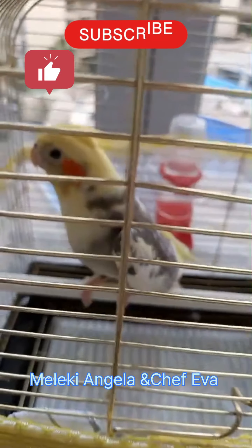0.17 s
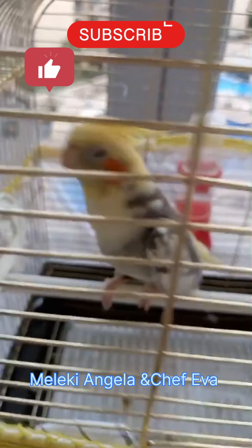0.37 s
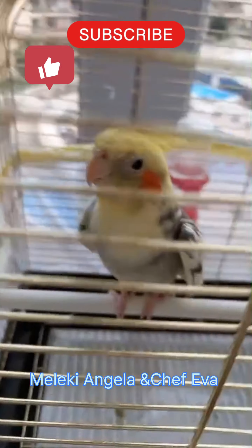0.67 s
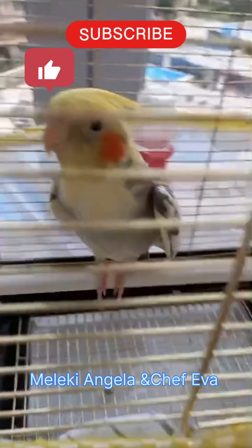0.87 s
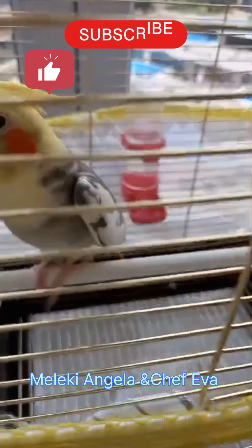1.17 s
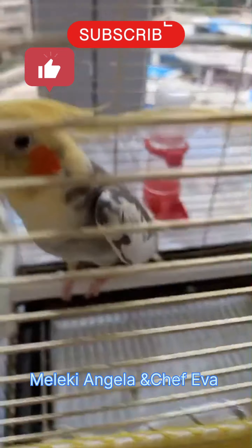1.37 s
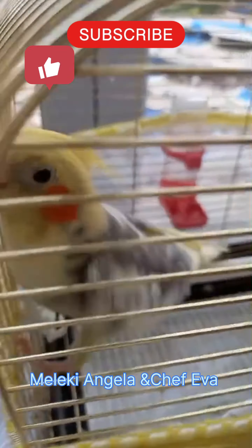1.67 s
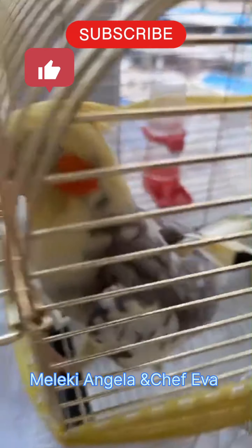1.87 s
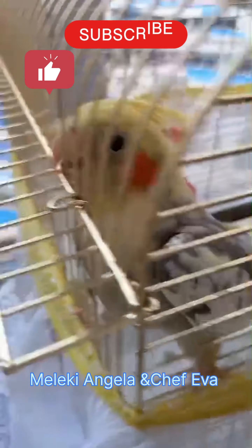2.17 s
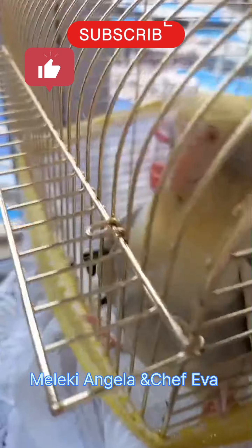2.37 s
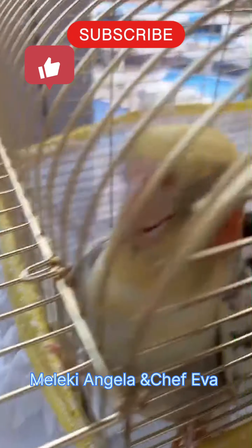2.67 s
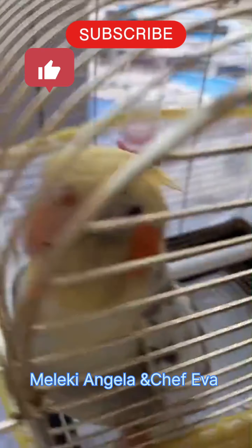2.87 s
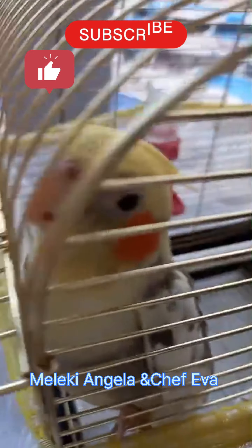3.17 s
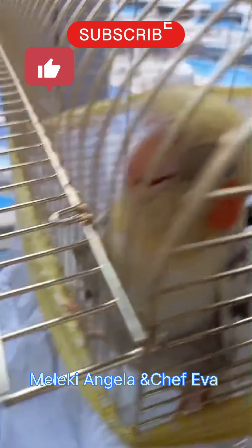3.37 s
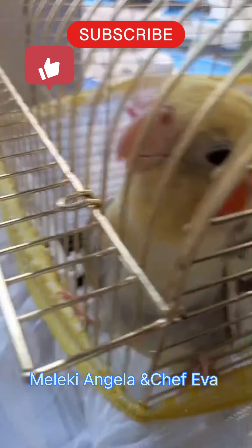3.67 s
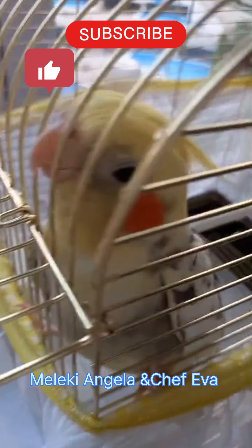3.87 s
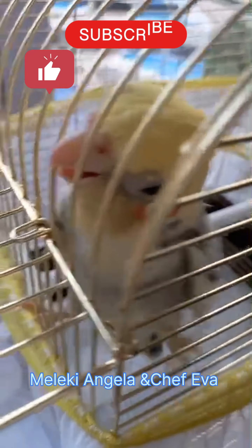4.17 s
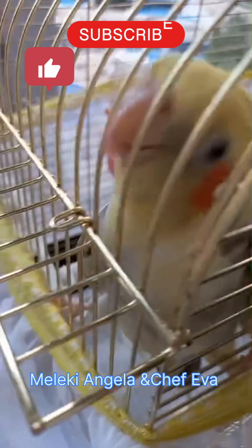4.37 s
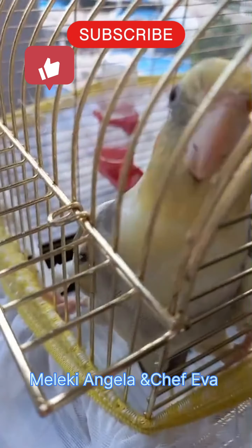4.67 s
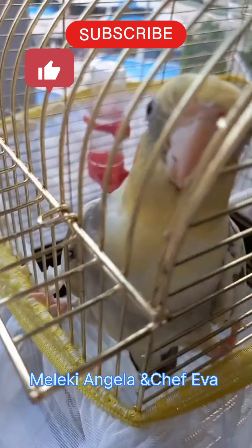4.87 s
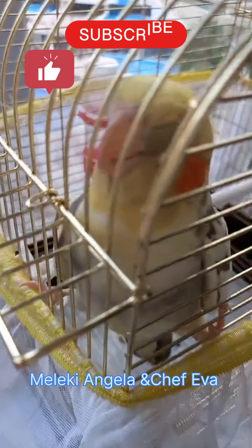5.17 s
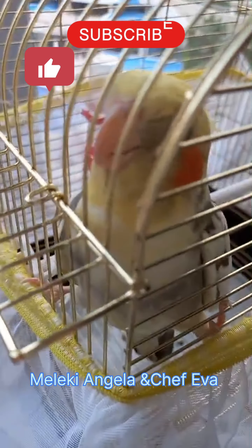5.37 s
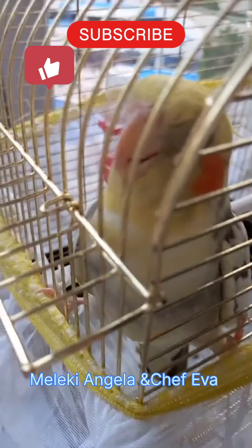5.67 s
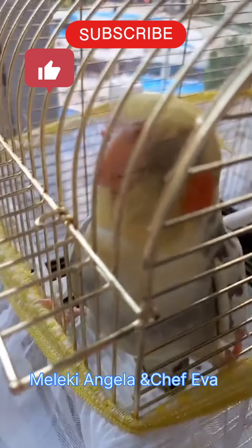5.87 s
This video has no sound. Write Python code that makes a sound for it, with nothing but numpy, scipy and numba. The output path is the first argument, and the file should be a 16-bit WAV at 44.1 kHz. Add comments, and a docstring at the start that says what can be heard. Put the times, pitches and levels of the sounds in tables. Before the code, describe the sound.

The first 1.2 seconds hold only faint room hiss and a weak, wavering low hum. At about 1.2 s a cockatiel, close and left of centre, gives a tiny croak opening into a short whistle, then a longer, slightly rough, nearly level one at 1.4-1.6 s. Quiet follows, with barely audible cage ticks near 1.8 and 2.2 s. At 2.45 s a short chip starts a run of seven raspy, throaty chirps, about six per second, each dipping and rising, until 3.6 s. A very faint, thin, high squeak overlaps the end, then a breathy hiss at 3.7-3.95 s. A croak and bright whistle come at 4.15 s, another whistle at 4.4-4.6 s leaping to a loud piercing peak. A tick and gritty scrape follow around 4.7 s. From 5.05 s a chip and five more chirps run to the end. The small hard room and cage wires add short reflections.

```python
"""In a small hard room a cockatiel in a wire cage sings close to a phone, nearer its left port.
Whistles are overtone stacks on one phase that at times skip cycles; a thin squeak is one gliding sine.
Croaks, chips, chirps, a hiss and a scrape are an irregular flutter of the syrinx ringing a throat,
a beak and a nasal resonance. A low hum wavers under faint room hiss; short decaying rings tick in
the cage. The room and the cage wires answer the bird with decaying noise."""
import sys
import numpy as np
from scipy import signal
from scipy.fft import rfft, irfft, next_fast_len
from scipy.io import wavfile
from scipy.ndimage import uniform_filter1d
from numba import njit

SR = 44100
rng = np.random.default_rng(int(sys.argv[2]) if len(sys.argv) > 2 else 0)


def to_wav(sig):
    """Store sig (one row per channel, or 1-D mono) as 16-bit WAV at the path in sys.argv[1].

    Samples outside -1..1 are clipped; the rate is SR.
    """
    pcm = np.clip(np.atleast_2d(sig), -1, 1) * 32767
    pcm = np.round(pcm).astype(np.int16)
    wavfile.write(sys.argv[1], SR, pcm.T)  # frames by channels


def nominal_scale(level):
    """Amplitude ratio for a level in decibels (scalar or array-like)."""
    x = np.asarray(level, float) / 20
    return 10 ** x


N = 265923
T = np.arange(N) / SR  # time in s


def unit(x):
    """Power normalisation: scale to rms 1."""
    return x / np.sqrt(np.mean(x ** 2))


def curve(rows):
    """Linear interpolation: the columns of a table over all samples, the first column being time in s."""
    s, *columns = np.transpose(rows)
    return np.array([np.interp(T, s, c) for c in columns])


def colour_db(hz, points):
    """Logarithmic frequency scale: read (Hz, value) points along it."""
    f, db = np.transpose(points)
    return np.interp(np.log(np.maximum(hz, 1)), np.log(f), db)


def shape(x, points, lag_s=0.):
    """Linear filtering: a spectrum times a gain in (Hz, dB) points and the phase of a pure delay."""
    size = next_fast_len(N + 4096)
    hz = np.arange(size // 2 + 1) * SR / size
    response = nominal_scale(colour_db(hz, points)) * np.exp(-2j * np.pi * hz * lag_s)
    return irfft(rfft(x, size) * response, size)[..., :N]


@njit
def svf(x, hz, width):
    """Second-order resonance: a state-variable band-pass whose centre and width move."""
    y, b, l = np.empty(len(x)), 0., 0.
    for i in range(len(x)):
        g, k = np.tan(np.pi * hz[i] / SR), width[i] / hz[i]
        v = (b + g * (x[i] - l)) / (1 + g * (g + k))
        b, l, y[i] = 2 * v - b, l + 2 * g * v, k * v
    return y


def band(x, hz, width_hz):
    """Cascaded resonance: two equal band-passes, with the same power whatever their width."""
    hz, width_hz = hz + 0 * T, width_hz + 0 * T
    once = svf(x, hz, width_hz)
    return unit(svf(once, hz, width_hz) / np.sqrt(width_hz))


def walk(rate):
    """Low-pass filtered noise: a smooth random wander of spread 1."""
    size = max(int(SR / rate), 1)
    smooth = uniform_filter1d(rng.standard_normal(N), size)
    return unit(uniform_filter1d(smooth, size))


def locked(x, grip):
    """Self-sustained vibration: amplitude limiting evens out the swing of a narrow band."""
    swing = np.abs(signal.hilbert(x, next_fast_len(N))[:N])
    return unit(x / (swing + 0.06) ** grip)


EDGE_DB = -26  # level at the foot of an attack or release, against its first or last row


def edged(rows, attack_s, release_s, levels):
    """Exponential onset and decay: add the foot of each; levels marks the dB columns."""
    rows, drop = np.array(rows, float), EDGE_DB * np.array(levels)
    first, last = rows[0] + drop, rows[-1] + drop
    first[0], last[0] = first[0] - attack_s, last[0] + release_s
    return np.vstack([first, rows, last])


# low hum before its random waver: time_s [s], level_db [dB]
HUM_LEVEL = [(0.0, -76.5), (0.55, -55.5), (0.94, -61), (1.02, -73.5), (1.54, -61.5), (1.83, -75.5),
             (1.98, -60), (2.25, -84), (2.62, -60.5), (2.75, -71.5), (3.27, -48.5), (3.32, -62.5),
             (4.25, -62), (4.3, -73), (4.42, -53), (4.79, -80.5), (5.09, -60), (6.03, -65)]
# gain of the room hiss's treble before its slow wander: time_s [s], gain_db [dB]
HISS_GAIN = [(0.0, -65), (0.94, -67), (1.25, -47.5), (1.7, -60), (2.27, -66), (2.69, -54), (3.5, -64.5),
             (4.1, -75), (4.9, -74.5), (5.3, -61.5), (6.03, -56)]
# relative spectral density of the room hiss: frequency_hz [Hz], density_db [dB per Hz]
HISS_SPECTRUM = [(20, 13.5), (50, 23), (130, 15), (270, 14.5), (600, 5), (1400, -2.5), (3500, -7.5),
                 (4600, -9.5), (5700, 1), (6800, -4.5), (7800, -16.5), (12000, -12.5), (16000, -13)]


def background():
    """Partial coherence: a hum nearly equal at both ports, and hiss shared only at low frequencies."""
    hum_gain = nominal_scale(curve(HUM_LEVEL)[0] + 4.2 * walk(8))
    hum = locked(band(rng.standard_normal(N), 84., 12.9), 0.65) * hum_gain
    side = band(rng.standard_normal(N), 84., 25.) * hum_gain * nominal_scale(-18.0)
    near, left, right = rng.standard_normal((3, N))
    shared = shape(near, [(60, 1.0), (300, 3.5), (700, -7), (1500, -22)])
    hiss = shape(np.array([left, right]) + shared, HISS_SPECTRUM)
    treble = shape(hiss, [(250, -34.0), (700, 0.0)])
    rumble = nominal_scale(-75.0) * (hiss - treble)
    treble = treble * nominal_scale(curve(HISS_GAIN)[0] + 1.07 * walk(1.3))
    return hum * nominal_scale([[-1.2], [1.2]]) + side * np.array([[1], [-1]]) + rumble + treble


def short_call(course, start_s, length_s, db, change_db):
    """Time scaling: stretch a course of resonances to a call's length and level."""
    share, throat_hz, throat, beak_hz, beak, nasal, air = np.transpose(course)
    db = db + change_db * (share - .5)
    return np.transpose([start_s + share * length_s, throat_hz, throat + db,
                         beak_hz, beak + db, nasal + db, air + db])


# croaks that open a whistle: start_s [s], length_s [s], gain_db on the course [dB],
# change_db over the call [dB]
CROAK_TIMES = [(1.171, .03, -5, 2), (4.136, .022, 1.5, -4)]
# course of a croak: share of length [0-1], throat_hz [Hz], throat_db [dB], beak_hz [Hz], beak_db [dB],
# nasal_db [dB], air_db [dB]
CROAK_COURSE = [(0., 1300, -45.5, 2550, -27.5, -44.5, -65), (.5, 1460, -32.5, 2920, -46, -66.5, -75),
                (1., 1450, -43.5, 2830, -37, -67, -71)]


def croaks():
    """Gliding formants: throat and beak resonances of each low croak."""
    return [(short_call(CROAK_COURSE, *row), "croak") for row in CROAK_TIMES]


# manner of each kind of call; narrow sings, wide hisses: base width of the throat resonance [Hz],
# nominal membrane slaps [per s], turbulence against slaps [ratio]
CALL_MANNER = {"chirp": (125, 850, .6), "croak": (200, 200, .8), "chip": (290, 235, 0.82),
               "hiss": (680, 900, 1), "scrape": (440, 140, 1)}


def rasped_calls():
    """Source-filter model: every call in time order, as resonance rows and the manner of its source."""
    calls = croaks() + chips() + chirps() + hiss_call() + scrape()
    calls.sort(key=lambda call: call[0][0, 0])
    attack_s, release_s = .003, .008
    levels = [0, 0, 1, 0, 1, 1, 1]
    rows = [edged(call, attack_s, release_s, levels) for call, _ in calls]
    return rows, [CALL_MANNER[kind] for _, kind in calls]


def rasps():
    """Forced resonance: irregular membrane slaps and turbulence ring the throat, beak and nasal cavity."""
    calls, manner = rasped_calls()
    throat_hz, throat_db, beak_hz, beak_db, nasal_db, air_db = curve(np.vstack(calls))
    voiced = sum((T >= r[0][0]) & (T <= r[-1][0]) for r in calls)
    voiced = uniform_filter1d(1. * voiced, size=100)
    current = np.searchsorted([r[-1][0] for r in calls[:-1]], T)
    width_hz, rate, turbulence = np.transpose(manner)[:, current]

    # a slap falls wherever the wandering rate completes a whole count
    count = np.floor(np.cumsum(rate * np.exp(0.45 * walk(600))) / SR)
    slaps = np.diff(count, prepend=0) * nominal_scale(2.1 * rng.standard_normal(N)) * np.sqrt(SR / rate)
    flutter = (slaps + turbulence * rng.standard_normal(N)) / np.sqrt(1 + turbulence ** 2)

    throat = locked(band(flutter, throat_hz, 1.46 * width_hz), 0.64)
    beak = band(flutter, beak_hz, 500 + 0.48 * width_hz)
    beak += nominal_scale(-16) * band(flutter, 838.0, 1300.0)
    nasal = band(flutter, 3400 + 0.79 * beak_hz, 700 + 0.34 * width_hz)
    nasal += nominal_scale(-27) * band(flutter, 8870.0, 1400.)

    # an open, hissing beak fills the gaps between resonances and lowers the air noise
    wide = np.clip(width_hz / 600, 0, 1)
    nasal += nominal_scale(-30.5 + 33.0 * wide) * band(flutter, 6000.0, 2500.)
    thin = unit(shape(flutter, [(6500, -41), (8000, -6.0), (9000, -17.5), (10800, -16),
                                (12000, 11.0), (14000, 10.5), (15500, 8.5)]))
    air = (1 - wide) * thin * nominal_scale(2.5 * walk(300)) + wide * band(flutter, 9950.0, 2700.0)

    voiced = voiced * nominal_scale(0.92 * walk(60))  # the effort is uneven
    tract = nominal_scale(throat_db) * throat - nominal_scale(beak_db) * beak + nominal_scale(nasal_db) * nasal + nominal_scale(air_db) * air
    return voiced * tract


# the vibration repeats every third cycle in this span, every second elsewhere: from and to [s]
TRIPLING_SPAN = (1.35, 1.572)
# how windpipe and beak colour in-between lines, upper overtones and breath: frequency_hz [Hz], gain_db [dB]
WINDPIPE_COLOUR = [(400, -20.5), (650, -7.5), (1000, -3), (1900, 5.5), (2600, 2), (3300, -8.5),
                   (4500, -14.5), (5700, -6.5), (6600, -12), (7800, -27), (10000, -12.5), (12500, -27),
                   (14000, -29), (16000, -41.5)]
FOURTH_DB, UPPER_DB = -8.5, -2.5  # base level of the fourth overtone and those above the fifth, against the third


def whistle(rows, manner, wobble, breath, air, rough):
    """Harmonic series and subharmonics: skipped cycles put lines at halves or thirds of the pitch."""
    out = np.zeros(N)
    attack_s, release_s, fifth_db, between_db, rasp_db, air_db = manner
    rows = edged(rows, attack_s, release_s, [0, 0, 1, 1, 1, 1])
    span = slice(int(rows[0][0] * SR), int(rows[-1][0] * SR))
    hz, first_db, second_db, third_db, low_db = curve(rows)[:, span]

    lopsided_db = np.clip(second_db - third_db, -25, 25)  # a lopsided cycle favours even overtones
    fourth_db = third_db + FOURTH_DB + 0.23 * lopsided_db
    fifth_db = third_db + fifth_db - 0.65 * lopsided_db
    overtone_db = [first_db, second_db, third_db, fourth_db, fifth_db]
    high_db = third_db + between_db

    hz = hz * (1 + 0.0032 * wobble[span])
    phase = 2 * np.pi * np.cumsum(hz) / SR
    voice = sum(nominal_scale(db) * np.cos((k + 1) * phase) for k, db in enumerate(overtone_db))

    tripled = 1. * ((T > TRIPLING_SPAN[0]) & (T < TRIPLING_SPAN[1]))
    tripled = uniform_filter1d(tripled, size=300)[span]
    for parts, share, headroom_db in ((2, 1 - tripled, 8), (3, tripled, 25)):
        for k in range(1, 13 * parts):
            order, between = k / parts, k % parts > 0
            if not between and order <= 5:
                continue  # already in the voice
            if order < 2:
                db = low_db
            elif between:
                db = np.minimum(high_db, low_db + headroom_db)
            else:
                db = third_db + UPPER_DB
            db = db + colour_db(order * hz, WINDPIPE_COLOUR)
            if between:  # each in-between line flickers
                db = db + 4.7 * np.roll(rough, 1000 * k)[span]
            voice += share * nominal_scale(db) * (order * hz < 16000) * np.cos(order * phase + k ** 2)

    # air leaks past the membranes in step with the effort
    effort = nominal_scale(np.max(overtone_db, axis=0))
    leak = nominal_scale(-5) * nominal_scale(np.maximum(low_db, high_db)) + nominal_scale(rasp_db) * effort
    out[span] = np.sqrt(2) * voice + leak * breath[span] + nominal_scale(air_db) * effort * air[span]
    return out


# one table a whistle: time_s [s], pitch_hz before a slight wobble [Hz], first, second and third
# overtone [dB rms each], base level of the skipped-cycle lines [dB]
WHISTLE_COURSES = [
    [(1.205, 1303, -32.5, -24.5, -41, -55), (1.225, 1230, -28.5, -38, -52, -74),
     (1.25, 1224, -27, -48, -63, -44.5), (1.295, 1400, -28, -62, -65, -38.5),
     (1.315, 1413, -25.5, -57, -64, -50)],
    [(1.384, 1329, -39, -57, -85, -56), (1.404, 1174, -34, -62, -62, -55),
     (1.425, 1234, -33, -52, -40.5, -54), (1.45, 1216, -34, -54, -35.5, -68),
     (1.54, 1242, -33, -54, -37, -50.5), (1.565, 1263, -31, -38, -36, -70),
     (1.577, 1302, -28, -31.5, -29.5, -52), (1.595, 1293, -34, -24, -31.5, -79),
     (1.614, 1263, -31, -32.5, -35.5, -86)],
    [(4.165, 1271, -30, -20.5, -41, -69), (4.185, 1302, -29, -13.5, -38, -62),
     (4.2, 1234, -23, -23.5, -52, -59.5), (4.215, 1277, -25, -32, -50, -42),
     (4.235, 1383, -30.5, -51, -67, -34.5), (4.255, 1543, -25, -58, -69, -41),
     (4.266, 1410, -35, -55, -66, -45)],
    [(4.41, 1424, -41, -49, -84, -64.5), (4.425, 1248, -35.5, -42.5, -76, -57),
     (4.45, 1159, -29.5, -49, -51, -63.5), (4.51, 1285, -28.5, -42, -48, -40.5),
     (4.53, 1304, -24, -30, -42.5, -43), (4.545, 1542, -21.5, -37, -48.5, -59),
     (4.556, 1752, -15, -36, -42, -58), (4.564, 1857, -20, -30.5, -48, -56),
     (4.569, 2565, -8, -34.5, -59, -47), (4.577, 2600, -7, -43, -60, -47.5),
     (4.592, 2696, -11.5, -32.5, -62, -57), (4.602, 2565, -14, -46, -67.5, -63)],
]
# one row a whistle: attack_s [s], release_s [s], base level of the fifth overtone and of the high in-between
# lines against the third [dB], rasp_db and air_db against the loudest overtone [dB]
WHISTLE_VOICING = [(.007, .012, -16, -28, -31.5, -44), (.008, 0.0035, -11.5, -12.5, -31, -57),
                   (.01, 0.011, -14.5, 0, -32, -30.5), (.012, 0.005, -14.5, 0, -43.5, -40)]


def whistles():
    """Superposition: all clear notes, sharing one random wobble, breath, air and flicker."""
    wobble = walk(200)
    breath = unit(shape(rng.standard_normal(N), WINDPIPE_COLOUR))
    air, rough = band(rng.standard_normal(N), 12800., 5000.), walk(120)
    return sum(whistle(rows, manner, wobble, breath, air, rough)
               for rows, manner in zip(WHISTLE_COURSES, WHISTLE_VOICING))


# cage and claw ticks: start_s [s], level_db [dB], centre_hz [Hz], decay_s to 1/e [s]
TICK_LIST = [(1.841, -34, 6240, 0.00062), (2.215, -39.5, 5700, 0.0011), (2.436, -38.5, 1420, 0.0025),
             (4.384, -37, 1300, 0.0024), (4.679, -23, 2604, .0005), (5.032, -40.5, 1300, 0.009)]


def ticks():
    """Damped free vibration: each tick is a decaying sine with a trace of noise at its onset."""
    out, t = np.zeros(N), np.arange(600) / SR
    chance = rng.standard_normal((len(TICK_LIST), 600))
    for (s, db, hz, decay_s), noise in zip(TICK_LIST, chance):
        ring = np.sin(2 * np.pi * hz * t) * np.exp(-t / decay_s)
        ring = ring + 0.03 * noise * np.exp(-t / 0.00051)
        start = int(s * SR)
        out[start:start + 600] += nominal_scale(db) * ring
    return out


# chips that open a run: start_s [s], length_s [s], gain_db on the course [dB], change_db over the call [dB]
CHIP_TIMES = [(2.452, .017, -2.4, 0.11), (5.049, .026, 0.56, 0.12)]
# course of a chip: share of length [0-1], throat_hz [Hz], throat_db [dB], beak_hz [Hz], beak_db [dB],
# nasal_db [dB], air_db [dB]
CHIP_COURSE = [(0., 1830, -33, 2340, -31, -48, -80), (.35, 1827, -28.5, 2350, -47.5, -51, -84),
               (.75, 1870, -31, 2600, -29, -45.5, -81), (1., 1880, -27, 2350, -51.5, -53, -73)]


def chips():
    """Near-steady formants: throat and beak resonances of each brief chip."""
    return [(short_call(CHIP_COURSE, *row), "chip") for row in CHIP_TIMES]


# course of a chirp: share of length [0-1], throat dip and beak dip [shares of the depth],
# throat_db, beak_db, nasal_db and air_db before the chirp's own gain [dB each]
CHIRP_COURSE = [(0., 0.016, .05, -25.5, -29.5, -47, -91), (.2, .38, -0.079, -20, -24, -40, -91),
                (.4, 0.897, 1.14, -21, -29, -40, -72), (.6, 1.053, 1.18, -22, -30, -55.5, -77),
                (.8, .4, .75, -25.5, -25, -41.5, -79), (1., 0.12, -0.17, -16.5, -24.5, -40, -81.5)]
# this chirp stops at the bottom of its dip: start [s], last moment kept [s]
BROKEN_OFF = (3.559, 3.618)
THROAT_TOP_HZ, BEAK_TOP_HZ = 2070, 2750
AIR_DB_PER_HZ = 0.0437  # deeper dips blow more air


def chirp(start_s, length_s, opening_hz, low_hz, db, opening_db, closing_db):
    """Coupled formant glide: throat and beak dip together and come back up."""
    share, throat_dip, beak_dip, throat, beak, nasal, air = np.transpose(CHIRP_COURSE)
    depth = THROAT_TOP_HZ - low_hz
    db = db + opening_db * (1 - share) ** 2 + closing_db * share ** 2
    top_hz = THROAT_TOP_HZ + (opening_hz - THROAT_TOP_HZ) * np.clip(1 - share / 0.74, 0, 1)
    rows = np.transpose([start_s + share * length_s, top_hz - throat_dip * depth, throat + db,
                         BEAK_TOP_HZ - beak_dip * depth, beak + db, nasal + db,
                         air + db + AIR_DB_PER_HZ * depth])
    is_broken = abs(start_s - BROKEN_OFF[0]) < length_s
    return rows[~((rows[:, 0] > BROKEN_OFF[1]) & is_broken)]


# chirps of the fast runs: start_s [s], length_s [s], opening throat_hz [Hz], lowest throat_hz
# that sets the depth [Hz], gain_db on the course [dB], opening accent [dB], closing accent [dB]
CHIRP_TIMES = [(2.521, 0.097, 2520, 1855, 1.4, -8, -1), (2.679, 0.1, 2144, 1615, 2.5, -4.1, -2.5),
               (2.846, 0.1, 2063, 1618, 3.65, -5.2, -6), (3.016, .11, 2070, 1568, 8.3, -9.5, -7),
               (3.197, .11, 2070, 1615, -0.4, 3, 1.1), (3.368, 0.12, 2065, 1574, -2.2, 4, 3.7),
               (3.558, 0.095, 2196, 1562, 1.45, 0.5, -3), (5.133, 0.095, 1998, 1890, 1.3, -2.6, -1.7),
               (5.295, 0.097, 2034, 1710, 1, -0.7, -7), (5.463, 0.11, 2070, 1651, -2.3, 3.5, 4),
               (5.638, 0.14, 2174, 1580, -1.5, 1, 1.5), (5.836, 0.14, 2163, 1512, -0.2, 1, -1)]


def chirps():
    """Frequency modulation: a run of calls whose resonances each dip and return."""
    return [(chirp(*row), "chirp") for row in CHIRP_TIMES]


# a thin high arch: time_s [s], pitch_hz [Hz], level_db before a gain of 10.5 dB [dB rms]
SQUEAK_COURSE = [(3.53, 13400, -91), (3.566, 14400, -79), (3.614, 14200, -73), (3.676, 14221, -77),
                 (3.728, 13940, -78), (3.74, 13151, -87)]


def squeak():
    """Phase integration: a single sine follows a gliding pitch."""
    hz, db = curve(edged(SQUEAK_COURSE, .01, .01, [0, 0, 1]))
    sounding = (T > SQUEAK_COURSE[0][0] - .01) * (T < SQUEAK_COURSE[-1][0] + .01)
    return np.sqrt(2) * nominal_scale(db + 10.5) * np.cos(2 * np.pi * np.cumsum(hz) / SR) * sounding


def open_beak(rows, throat_db, nasal_db):
    """Common excitation: one effort drives throat and beak; the nasal ring goes with the treble."""
    s, throat_hz, beak_hz, db, treble_db = np.transpose(rows)
    return np.transpose([s, throat_hz, db + throat_db, beak_hz, db, treble_db + nasal_db, treble_db])


# a long hiss: time_s [s], throat_hz [Hz], beak_hz [Hz], level_db [dB], treble_db [dB]
HISS_COURSE = [(3.704, 1660, 2730, -49, -86), (3.747, 1210, 2323, -38, -60.5),
               (3.833, 1150, 2420, -34.5, -52), (3.919, 1150, 2860, -32.5, -51),
               (3.962, 1240, 3046, -43, -66)]


def hiss_call():
    """Turbulent excitation: wide resonances of an open beak."""
    return [(open_beak(HISS_COURSE, throat_db=-3, nasal_db=5.0), "hiss")]


# a short scrape: time_s [s], throat_hz [Hz], beak_hz [Hz], level_db [dB], treble_db [dB]
SCRAPE_COURSE = [(4.646, 1366, 2760, -40, -77), (4.668, 1080, 2614, -40, -72),
                 (4.676, 867, 2600, -29, -66.5), (4.705, 864, 2630, -33, -60.5),
                 (4.718, 1346, 2620, -25.5, -57), (4.732, 1435, 2770, -27, -58.5),
                 (4.75, 1050, 2660, -37, -51), (4.77, 1000, 2737, -51, -65.5)]


def scrape():
    """Sparse impulsive excitation: slow slaps and turbulence in wide resonances."""
    return [(open_beak(SCRAPE_COURSE, throat_db=-5.5, nasal_db=-0.5), "scrape")]


# attenuation of the right port before its shadow: time_s [s], left_minus_right_db [dB]
PORT_BALANCE = [(1.1, 8.5), (1.7, 2.5), (2.5, 8), (3.5, 7.5), (4.15, 7), (4.6, 8.5), (5.1, 9.5), (6.0, 6)]
# colour of the direct sound at the right port: frequency_hz [Hz], gain_db [dB]
SHADOW_COLOUR = [(100, 2.5), (400, -1.5), (1300, 7), (2400, -1), (4400, -5), (6000, -10), (9000, -6),
                 (15000, 10)]


def ports(bird):
    """Level and arrival-time difference: direct sound at the left port, shadowed and later at the right."""
    right = shape(bird * nominal_scale(-curve(PORT_BALANCE)[0]), SHADOW_COLOUR, lag_s=0.00025)
    return np.array([bird, right])


# decay time of the room: frequency_hz [Hz], t60_s [s]
DECAY_TIME = [(300, 0.57), (1000, 0.35), (3000, 0.3), (6000, 0.28), (12000, 0.43)]
# colour of the sound sent into the room: frequency_hz [Hz], gain_db [dB]
REVERB_COLOUR = [(250, 2), (600, 0), (1300, 4.9), (2500, 0.96), (5000, 10.5), (9000, 4), (14000, 2.5)]


def room(bird, db):
    """Diffuse reverberation: a noise tail, different at each port, with a decay time for each octave."""
    t, tail = np.arange(SR // 2) / SR, 0
    noise = rng.standard_normal((2, len(t)))
    for hz in 250 * 2. ** np.arange(7):
        edges = [hz / np.sqrt(2), min(hz * np.sqrt(2), .45 * SR)]
        sos = signal.butter(2, edges, "bandpass", fs=SR, output="sos")
        tail = tail + signal.sosfilt(sos, noise) * nominal_scale(-60 * t / colour_db(hz, DECAY_TIME))
    tail = tail * np.clip(t / 0.0013, 0, 1)
    tail = tail / np.sqrt(np.sum(tail ** 2) / 2)
    return nominal_scale(db) * signal.fftconvolve(shape(bird, REVERB_COLOUR)[None], tail, axes=1)[:, :N]


# treble that the cage wires scatter to the ports: frequency_hz [Hz], gain_db [dB]
SCATTER_COLOUR = [(2500, -21.5), (5000, -10.5), (9000, -6), (14000, -1)]


def wires(bird):
    """Scattering: a short spray of treble echoes, different at each port."""
    t = np.arange(800) / SR
    spray = rng.standard_normal((2, len(t))) * np.exp(-t / 0.0023)  # decay in s
    spray = spray / np.sqrt(np.sum(spray ** 2) / 2)
    return signal.fftconvolve(shape(bird, SCATTER_COLOUR)[None], spray, axes=1)[:, :N]


# a small body radiates no bass: frequency_hz [Hz], gain_db [dB]
BODY_RADIATION = [(250, -11.5), (400, -10), (520, 0.5), (800, -0.69)]


def scene():
    """Superposition: direct sound at both ports, the room's answer, background and wire echoes."""
    bird = shape(rasps() + whistles() + ticks() + squeak(), BODY_RADIATION)
    return ports(bird) + room(bird, -16.0) + background() + wires(bird)


def roll_off(x):
    """The treble ends steeply here."""
    return signal.sosfilt(signal.butter(12, 16270, fs=SR, output="sos"), x)


# microphone response, with a dip above the port resonance: frequency_hz [Hz], gain_db [dB]
MICROPHONE_RESPONSE = [(6300, -0.5), (7000, -0.5), (7400, -4), (8200, -4), (15600, -2), (16300, -29.5)]


def record(dry):
    """Transducer frequency response: the phone's microphone ports colour the sound."""
    mix = shape(dry, MICROPHONE_RESPONSE)
    return roll_off(mix)


dry = scene()
out = record(dry)
to_wav(out)
```